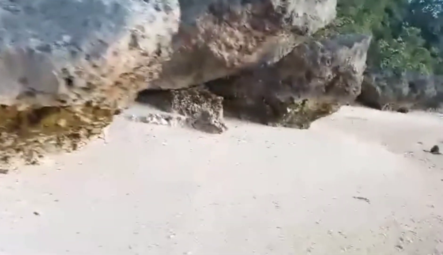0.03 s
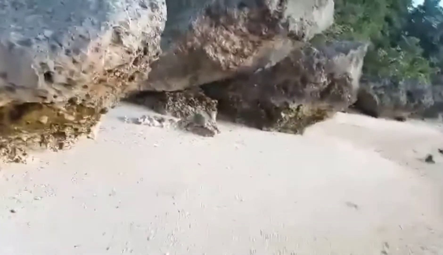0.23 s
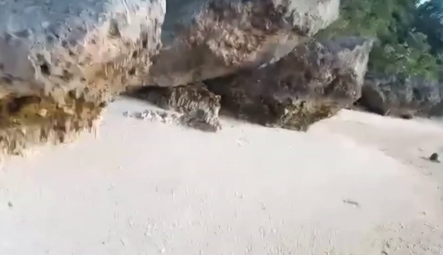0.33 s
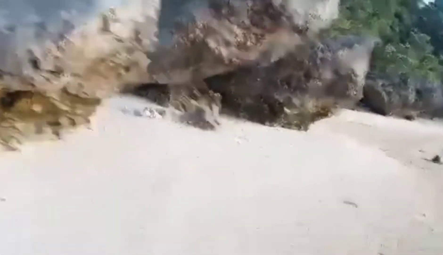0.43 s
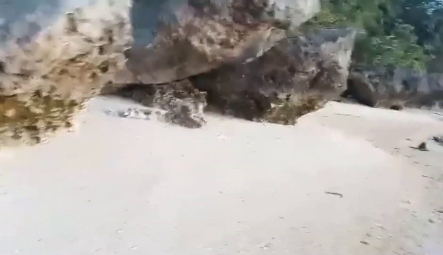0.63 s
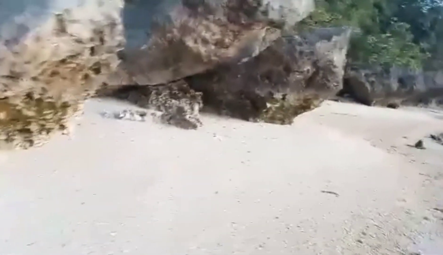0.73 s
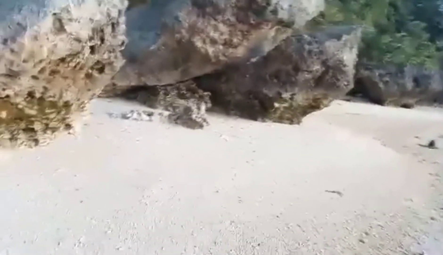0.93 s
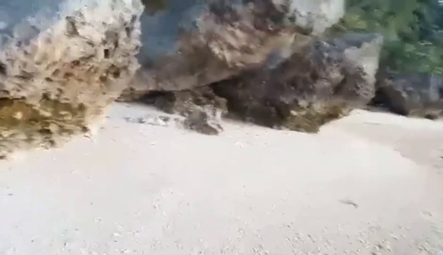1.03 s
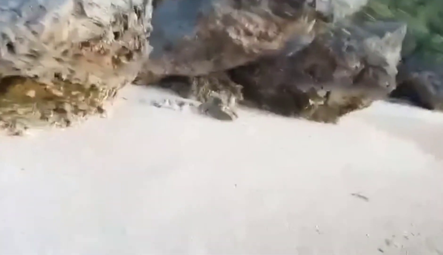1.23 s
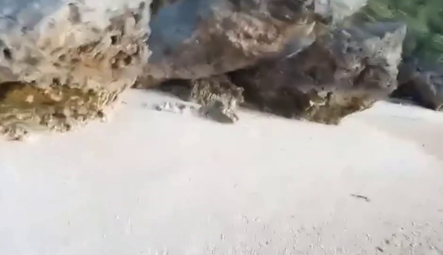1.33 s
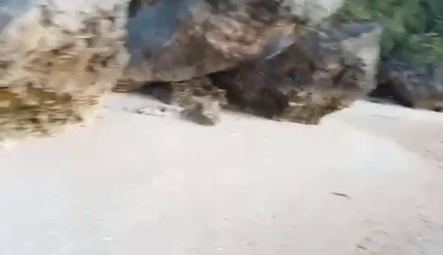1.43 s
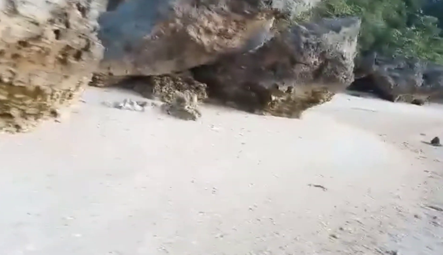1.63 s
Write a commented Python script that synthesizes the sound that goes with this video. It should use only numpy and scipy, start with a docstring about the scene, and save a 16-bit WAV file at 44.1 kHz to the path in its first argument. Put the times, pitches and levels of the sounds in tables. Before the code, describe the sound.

Two slow footsteps crunch on coarse sand, close to the microphone. Each grinds, snaps bits of coral and kicks up a little pattering sand. Behind them are a low wind rumble, faint beach surf and thin distant chirps.

```python
"""Two slow, close footsteps on coarse beach sand, over a low rumble and a faint wash of surf.
The first rolls in at 0.2 s: grains grind under the sole, coral snaps, the foot lands with a soft knock.
Kicked sand patters down until about 0.8 s, with a few pings of shell chips.
The second step grinds in at 1 s, throws a little more sand and ends in snaps that die out by 1.5 s.
Thin distant chirps come before, between and after the steps."""
import sys
import numpy as np
from scipy import signal
from scipy.io import wavfile
from scipy.ndimage import uniform_filter1d

SR = 44100
rng = np.random.default_rng(int(sys.argv[2]) if len(sys.argv) > 2 else 0)


def digitize_waveform(pressure):
    """Quantize a signal to 16-bit integers and store it at the path in sys.argv[1].

    Rows of a 2-D input are taken as channels; values are limited to [-1, 1].
    """
    field = np.atleast_2d(pressure).T
    bounded = np.clip(field, -1, 1)
    quanta = np.round(bounded * 32767).astype(np.int16)
    wavfile.write(sys.argv[1], SR, quanta)


N = 74970
T = np.arange(N) / SR
CUTOFF_HZ = 13150


def amp(db):
    """Decibels to gain."""
    return 10 ** (np.asarray(db) / 20)


def unit(x):
    """Scales to rms 1."""
    return x / np.sqrt(np.mean(x ** 2) + 1e-20)


def add(mix, start_s, sound):
    """Drops a sound into the mix at start_s."""
    part = mix[max(round(start_s * SR), 0):][:len(sound)]
    part += sound[:len(part)]


def colour(x, curve, size=8192):
    """Minimum-phase EQ that follows a curve of freq_hz, gain_db."""
    hz, db = np.transpose(curve)
    bins_hz = abs(np.fft.fftfreq(size, 1 / SR))
    log_gain = np.log(amp(np.interp(np.log(bins_hz + 1), np.log(hz), db)))
    response = np.exp(np.conj(signal.hilbert(log_gain)))
    taps = np.fft.ifft(response).real[:size // 2]
    return signal.fftconvolve(x, taps)[:N]


def noise(curve):
    """Noise shaped by an EQ curve, at rms 1."""
    return unit(colour(rng.standard_normal(N), curve))


def swells(rows):
    """Envelope with one bell-shaped swell for each row."""
    return sum(amp(db) * np.exp(-((T - peak_s) / width_s) ** 2 / 2) for peak_s, db, width_s in rows)


def grains(per_s, spread_db, bands=36):
    """Granular texture: tiny pops of many pitches and uneven size, at random moments."""
    out, t = np.zeros(N), T[:SR // 20]
    for hz in np.geomspace(120, CUTOFF_HZ, bands):
        size = amp(spread_db * np.minimum(rng.exponential(1, N), 3.5))
        clicks = size * rng.choice([-1, 1], N) * (rng.random(N) < per_s / bands / SR)
        attack_s = 0.5 / hz + 0.0003
        pop = t * np.exp(-t / attack_s) * np.sin(2 * np.pi * hz * t)
        out += np.sqrt(hz) * unit(signal.oaconvolve(clicks, pop)[:N])
    return out


def pops(rows, shape, sag, overtone_db, overtone_ratio=1.813, sag_s=0.0008):
    """Heavily damped two-mode rings whose pitch sags; a higher shape makes them tighter."""
    out, t = np.zeros(N), T[:SR // 10]
    for start_s, db, hz, attack_s in rows:
        bend = 1 + sag * (np.exp(-t / sag_s) - np.exp(-attack_s / sag_s))
        phase = 2 * np.pi * np.cumsum(hz * bend) / SR
        envelope = (t / attack_s * np.exp(1 - t / attack_s)) ** shape
        ring = np.sin(phase) + amp(overtone_db) * np.sin(overtone_ratio * phase)
        add(out, start_s, amp(db) * envelope * ring)
    return out


# coral giving way underfoot: start_s, level_db, pitch_hz, attack_s
CORAL_SNAPS = [(0.0546, -37, 1690, 0.00042), (0.059, -38, 1780, 0.00046), (0.1107, -38.5, 1790, 0.00042),
               (0.2536, -25.5, 1890, 0.0008), (0.332, -24.5, 1285, 0.00063), (0.3509, -20.5, 1370, 0.00093),
               (0.3538, -19.5, 1377, 0.00076), (.3670, -31, 1470, 0.00092), (0.3915, -14.5, 1570, 0.00035),
               (0.3941, -21, 1660, 0.0005), (0.397, -28, 1280, 0.00075), (0.4488, -26.5, 2100, 0.00043),
               (0.4494, -31, 1215, 0.00095), (0.7876, -38.5, 2730, 0.00039), (0.8561, -37.5, 1180, 0.0019),
               (0.899, -27, 1525, 0.00047), (0.9, -33.5, 1165, 0.0014), (1.0703, -29.5, 1530, 0.00077),
               (1.1105, -28, 1490, 0.0008), (1.1259, -19.5, 2040, 0.00047), (1.1266, -26, 1020, 0.0013),
               (1.1355, -27, 1500, 0.0006), (1.1598, -30.5, 1620, 0.00043), (1.2159, -28, 1750, 0.00039),
               (1.2187, -25.5, 1700, 0.000091), (1.2211, -32.5, 3500, 0.00061),
               (1.2325, -23.5, 1630, 0.00025), (1.385, -23, 1495, 0.00077), (1.4018, -17, 1413, 0.00074),
               (1.4195, -33.5, 1430, 0.00051), (1.4533, -33, 1960, 0.00079), (1.4744, -40.5, 1590, 0.00082)]
def snaps():
    """Bits of coral crack with a short hollow ring: too small for bass, their treble muffled by sand."""
    low_cut = signal.butter(3, 656, "high", fs=SR, output="sos")
    muffle = signal.butter(4, 4200, fs=SR, output="sos")
    cracks = pops(CORAL_SNAPS, shape=1.67, sag=0.1, overtone_db=-16.5)
    return signal.sosfilt(np.vstack([low_cut, muffle]), cracks)


# envelope of the grind under the sole: time_s, level_db
GRIND_ENVELOPE = [(0, -61.5), (.055, -58), (.09, -59.5), (.215, -57), (.232, -43), (.275, -40.5),
                  (.325, -50), (.36, -42), (.42, -45.5), (.444, -51.5), (.466, -50.5), (.492, -64.5),
                  (.504, -45), (.525, -66.5), (.767, -66), (.773, -50.5), (.815, -55), (.88, -51),
                  (.92, -57), (.985, -51.5), (.992, -42.5), (1.004, -45), (1.04, -44.5), (1.066, -37.5),
                  (1.1, -48.5), (1.135, -41), (1.17, -48.5), (1.22, -48.5), (1.295, -62), (1.33, -49.5),
                  (1.37, -58), (1.42, -54), (1.475, -54), (1.51, -62), (1.7, -61.5)]
# tone of coarse sand: freq_hz, gain_db
GRIT_EQ = [(100, -19.5), (300, -48.5), (700, -13.5), (1000, 0), (1350, 5), (2000, 2), (2600, -4.5),
           (3500, -7.5), (4400, -17.5), (5600, -31), (7000, -28.5), (9500, -50.5), (13000, -63)]
def grinding(full_load_per_s=30000, thinning=0.25):
    """Grains slip in a dense gritty grind: louder under load, quieter and a bit thinner on the lift."""
    level_db = np.interp(T, *np.transpose(GRIND_ENVELOPE))
    density = amp(thinning * (level_db - level_db.max()))
    slips = unit(colour(grains(full_load_per_s * density, spread_db=3.5), GRIT_EQ))
    return amp(level_db) * slips / np.sqrt(density / density.mean())  # make-up gain for the thinning


def crumbs(offset_db=-37.5, decay_s=0.0087):
    """Crumbs leave a short gritty tail after each snap."""
    envelope, t = np.zeros(N), T[:SR // 10]
    for start_s, db, _, _ in CORAL_SNAPS:
        add(envelope, start_s, amp(db + offset_db) * np.exp(-t / decay_s))
    return envelope * noise(GRIT_EQ)


# soft knocks of the foot: start_s, level_db, pitch_hz, attack_s
FOOT_KNOCKS = [(.3915, -37.5, 377, 0.003), (1.146, -42, 80, 0.0051), (1.2638, -37, 525, 0.0021)]
# tiny shell chips: start_s, level_db, pitch_hz, attack_s
SHELL_PINGS = [(0.4793, -35.5, 3320, 0.00072), (.725, -53, 6500, 0.00058), (.753, -54, 4850, 0.0011)]
def knocks_and_pings():
    """The foot lands with a dull knock and shell chips ping brightly, all quickly damped."""
    return pops(FOOT_KNOCKS + SHELL_PINGS, shape=2.6, sag=0.15, overtone_db=-28)


# the foot's weight bearing down: peak_s, level_db, width_s
PRESSES = [(.27, -59.5, 0.037), (.38, -59, 0.023), (.457, -55, 0.018), (1.06, -62, 0.036),
           (1.142, -50.5, 0.014), (1.22, -59, 0.025)]
# tone of packed sand: freq_hz, gain_db
PACKED_EQ = [(60, -29.5), (160, 9.5), (350, 4), (700, 12), (1000, 3.5), (1600, -32.5), (5000, -79)]
def packing():
    """Deeper sand packs under full weight and gives the step a duller crunch."""
    return swells(PRESSES) * unit(colour(grains(per_s=30000, spread_db=3.5), PACKED_EQ))


# kicked sand landing: start_s, level_db, decay_s
SPRAYS = [(0.394, -41.5, 0.01), (0.456, -40.5, 0.0092), (0.477, -61, 0.013), (0.498, -51.5, 0.023),
          (0.536, -47, 0.015), (0.587, -55.5, 0.033), (0.659, -61, 0.061), (1.056, -44.5, 0.012),
          (1.278, -58, 0.026)]
# tone of loose sand: freq_hz, gain_db
LOOSE_EQ = [(500, -18), (1500, 10.5), (3200, 10.5), (5000, -4.5), (8000, -11.5), (10000, -25), (13000, -23)]
def spray(attack_s=0.0009):
    """Fine bright patter of loose sand: each handful lands at once and trickles out."""
    envelope = np.zeros(N)
    for start_s, db, decay_s in SPRAYS:
        t = np.maximum(T - start_s, 0)
        envelope += amp(db) * np.minimum(t / attack_s, 1) * np.exp(-t / decay_s)
    return envelope * unit(colour(grains(per_s=22000, spread_db=2), LOOSE_EQ))


# dry sand sliding: peak_s, level_db, width_s
SWISHES = [(.25, -58.5, 0.033), (.63, -62, 0.12), (1.025, -58.5, 0.027)]
# tone of fine sand: freq_hz, gain_db
FINE_EQ = [(900, -10.5), (3400, 14.5), (4800, -3.5), (7800, -6.5), (10000, -18)]
def swish():
    """Smooth hiss of dry sand sliding off the foot and raining down."""
    return swells(SWISHES) * noise(FINE_EQ)


# tone of the low bed: freq_hz, gain_db
RUMBLE_EQ = [(24, -35), (46, -6.5), (64, 2.5), (115, -1.5), (200, -16), (320, -22.5), (800, -44.5),
             (3000, -74)]
def rumble(level_db=-58.5):
    """Steady low rumble of wind and sea."""
    return amp(level_db) * noise(RUMBLE_EQ)


# tone of the surf: freq_hz, gain_db
SURF_EQ = [(200, -13), (500, 2), (800, -9.5), (1200, 4), (1900, 14.5), (2600, -6.5), (3600, 7),
           (5200, -23.5), (7000, -14.5), (9500, -21.5), (13000, -20)]
def surf(level_db=-66.5, flutter_db=1.8):
    """Faint wash of water with a fluttering level."""
    flutter = unit(uniform_filter1d(rng.standard_normal(N), size=1200))
    return amp(level_db + flutter_db * flutter) * noise(SURF_EQ)


def wavering(hz, width_hz, blur):
    """A tone whose level and phase wander."""
    smooth = signal.butter(2, width_hz, fs=SR, output="sos")
    real, imag = unit(signal.sosfilt(smooth, rng.standard_normal((2, N))))
    wander = 1 + blur * (real + 1j * imag)
    return unit((wander * np.exp(2j * np.pi * hz * T)).real)


# distant chirps: start_s, level_db, pitch_hz
CHIRPS = [(.09, -78.5, 7020), (.132, -83, 7180), (0.747, -71.5, 8100), (.775, -77, 7930),
          (0.902, -70, 8020), (.948, -77, 8060), (1.44, -78.5, 7000), (1.595, -79, 7000),
          (1.635, -84, 7100)]
def chirps(attack_s=0.0095, t60_s=0.17):
    """Thin high notes, blurred and drawn out by the rocks."""
    out = np.zeros(N)
    for start_s, db, hz in CHIRPS:
        t = np.maximum(T - start_s, 0)
        fade_db = 60 * np.maximum(t - attack_s, 0) / t60_s
        envelope = np.minimum(t / attack_s, 1) * amp(db - fade_db)
        out += envelope * wavering(hz, width_hz=81, blur=0.65)
    return out


# stereo width: freq_hz, side_gain_db
SIDE_EQ = [(3200, -64), (4000, -35.5), (5000, -18), (8000, -12.5), (13000, -9.5)]
def stereo(source):
    """Plays a source twice, as mid and side: only the treble is wide."""
    mid, side = source(), colour(source(), SIDE_EQ)
    return np.array([mid + side, mid - side])


def scene():
    """Hits, packing, rumble and chirps sit in the centre; the sand textures and surf spread a little."""
    centre = snaps() + knocks_and_pings() + packing() + rumble() + chirps()
    return centre + stereo(grinding) + stereo(crumbs) + stereo(spray) + stereo(swish) + stereo(surf)


def record(dry):
    """Steep high cut on the whole mix."""
    taps = signal.firwin(511, CUTOFF_HZ, window=("kaiser", 9), fs=SR)
    return signal.oaconvolve(dry, taps[None], "same")


dry = scene()
out = record(dry)
digitize_waveform(out)
```